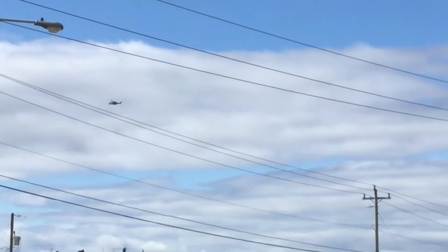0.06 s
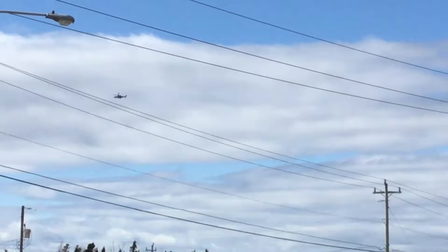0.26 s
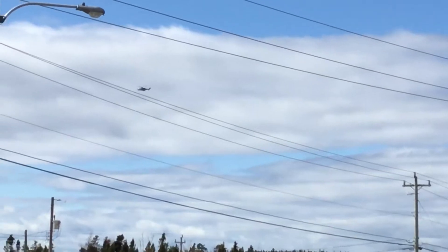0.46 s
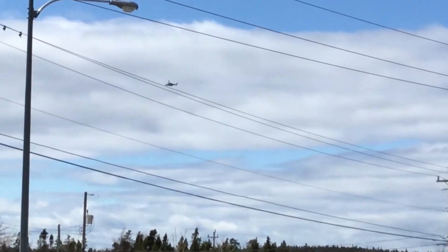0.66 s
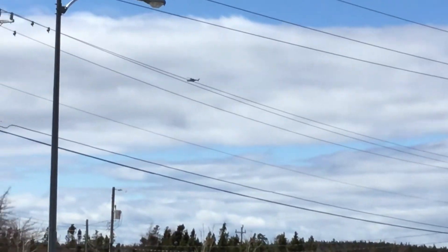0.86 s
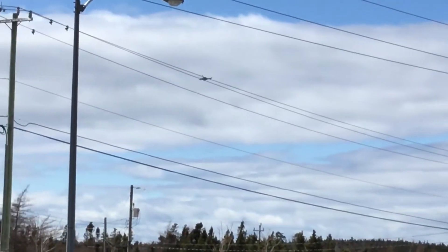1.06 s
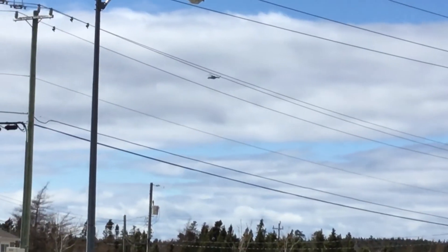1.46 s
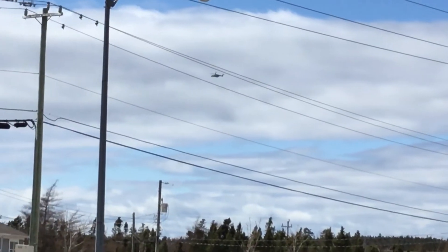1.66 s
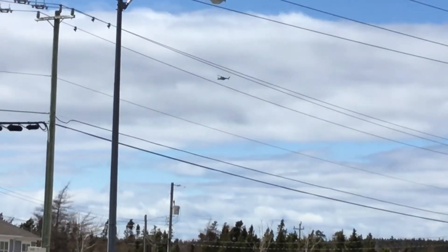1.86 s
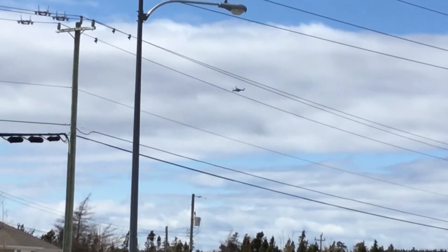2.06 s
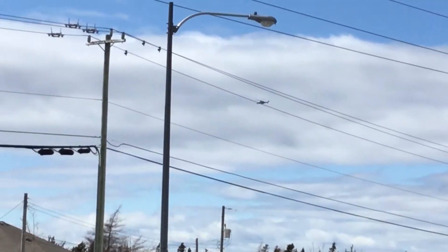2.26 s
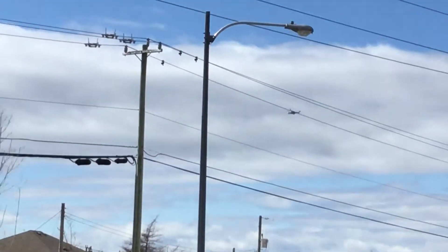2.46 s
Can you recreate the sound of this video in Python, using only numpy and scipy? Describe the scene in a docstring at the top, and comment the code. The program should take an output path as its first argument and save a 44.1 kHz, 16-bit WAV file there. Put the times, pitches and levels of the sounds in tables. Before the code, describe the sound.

A distant helicopter hums over a dull, faintly throbbing roar outdoors. Light gusts rumble and thump on the hand-held microphone throughout, with a brief rub and knock from the grip at the start and a softer one near the end.

```python
"""Distant helicopter in light wind

A far helicopter's tail rotor hums over a dull roar that throbs faintly with the main blades.
Gusts rumble on the microphone port of a hand-held camera, among short low thumps: wind buffets
and one small early knock. Twice the grip shifts: skin rubs, fingertips click and soft knocks
ring the case."""
import sys
import numpy as np
from scipy import signal
from scipy.fft import rfft, irfft
from scipy.io import wavfile

SR = 44100
rng = np.random.default_rng(int(sys.argv[2]) if len(sys.argv) > 2 else 0)


def to_wav(s):
    """Save 16-bit WAV."""
    ch = np.atleast_2d(s).T  # columns
    pcm = np.round(np.clip(ch, -1, 1) * 32767)  # PCM
    wavfile.write(sys.argv[1], SR, pcm.astype(np.int16))


N = 114660
T = np.arange(N) / SR


def amp(db):
    """Amplitude ratio of a level in decibels."""
    return 10 ** (np.asarray(db) / 20)


def unit(x):
    """Normalisation to rms 1."""
    return x / np.sqrt(np.mean(x ** 2) + 1e-20)


def curve(points):
    """Linear interpolation of (t/s, value) points."""
    return np.interp(T, *np.transpose(points))


def colour(x, spectrum):
    """Spectral shaping by (f/Hz, level/dB) points, at rms 1."""
    hz, db = np.transpose(spectrum)
    f = np.fft.rfftfreq(N, 1 / SR)
    gain = amp(np.interp(np.log(f + 1), np.log(hz), db))
    return unit(irfft(rfft(x) * gain, N))


def noise(spectrum):
    """Gaussian noise of a given spectral shape, at rms 1."""
    return colour(rng.standard_normal(N), spectrum)


def drift(hz):
    """Random fluctuation with a bandwidth of about hz, at rms 1."""
    f = np.fft.rfftfreq(N, 1 / SR)
    gain = np.exp(-(f / hz) ** 2) * (f > 0)
    return unit(irfft(rfft(rng.standard_normal(N)) * gain, N))


def lowpass(x, hz, order):
    """Causal low-pass filter."""
    return signal.sosfilt(signal.butter(order, min(hz, SR / 2 - 1), fs=SR, output="sos"), x)


def add(mix, s, sound):
    """Superposition of a sound on the mix from time s."""
    part = mix[max(round(s * SR), 0):][:len(sound)]
    part += sound[:len(part)]


# wind strength at the microphone: t/s, level/dB
GUST_LEVEL = [(0, -67), (.15, -56.5), (.32, -53.5), (.40, -54), (.48, -49), (.53, -56.5), (.59, -52.5),
              (.68, -50), (.75, -55.5), (.81, -64.5), (.92, -59.5), (1.07, -59), (1.18, -53), (1.26, -50.5),
              (1.33, -47.5), (1.43, -58), (1.57, -63.5), (1.66, -44), (1.74, -67.5), (1.82, -52.5),
              (1.98, -49.5), (2.10, -60), (2.28, -70), (2.34, -44), (2.42, -71), (2.48, -48), (2.53, -73.5),
              (2.6, -54)]
# spectrum of the turbulence: f/Hz, relative level/dB
WIND_SPECTRUM = [(15, -52), (22, -40), (30, -22), (42, -6), (60, 4.5), (100, 2.5), (170, -6.5), (260, -18),
                 (400, -30), (700, -38.5), (1500, -74.5)]

def wind(brightening=0.28, lump_db=3.5):
    """Turbulent pressure at the port: in a gust the upper band grows faster than the bass."""
    gust_db, flow = curve(GUST_LEVEL), noise(WIND_SPECTRUM)
    forward = lowpass(flow, hz=166, order=2)
    bass = lowpass(forward[::-1], hz=167, order=2)[::-1]  # the backward pass cancels the phase lag
    upper_db = brightening * (gust_db - gust_db.mean()) + lump_db * drift(hz=9.3)
    return amp(gust_db) * (bass + (flow - bass) * amp(upper_db))


# short low thumps (one small early knock, then wind buffets): t/s, peak level/dB, centre f/Hz
THUMP_PULSES = [(.062, -49, 275), (.374, -52, 320), (.395, -46, 255), (0.431, -44, 91.5),
                (.463, -42.5, 166), (.479, -41, 74), (.585, -42.5, 101), (0.683, -42.5, 124),
                (0.73, -52.5, 129), (0.988, -40, 141), (1.171, -41, 90), (1.21, -45, 55), (1.311, -38, 133),
                (1.644, -39, 177), (1.653, -36.5, 127), (1.781, -36.5, 149), (2.186, -44, 151),
                (2.486, -47.5, 89), (2.582, -48.5, 63.7)]

def thumps(width_cycles=0.45):
    """Each thump is one short pressure swing under a Gaussian envelope."""
    out = np.zeros(N)
    for s, db, hz in THUMP_PULSES:
        cycles = (T - s) * hz
        envelope = np.exp(-.5 * (cycles / width_cycles) ** 2)
        out += amp(db) * envelope * np.cos(2 * np.pi * cycles)
    return out


# slides of the grip: start t/s, rise/s, fall/s, peak level/dB
GRIP_SLIDES = [(0.21, 0.048, 0.013, -54.5), (2.313, .016, 0.037, -60)]
# spectrum of skin rubbing the case: f/Hz, relative level/dB
SKIN_SPECTRUM = [(40, -18), (100, -6), (300, 4), (620, 8.5), (820, -6.5), (1400, -14), (2700, -18.5),
                 (3500, -21.5), (4400, -28), (6500, -32), (9000, -42.5), (12000, -52)]

def rubs(grain_db=0.5):
    """Sliding friction makes grainy noise that swells and stops with the grip's motion."""
    envelope = sum(amp(db) * np.interp(T, [s, s + rise, s + rise + fall], [0, 1, 0]) ** 0.41
                   for s, rise, fall, db in GRIP_SLIDES)
    friction = rng.standard_normal(N) * amp(grain_db * drift(hz=400))
    return envelope * colour(friction, SKIN_SPECTRUM)


# fingertip landings: t/s, gain/dB, cutoff f/Hz
FINGER_TAPS = [(.2056, -45.5, 2800), (.2548, -44.5, 2660), (2.3168, -56, 6000)]

def finger_clicks(hz=594, t60_s=0.02):
    """A fingertip's impact excites one damped oscillation, a tiny hollow click."""
    out, t = np.zeros(N), T[:SR // 20]
    click = amp(-60 * t / t60_s) * np.cos(2 * np.pi * hz * t)
    for s, db, cutoff_hz in FINGER_TAPS:
        add(out, s, amp(db) * lowpass(click, cutoff_hz, order=6))
    return out


# modes of the case: f/Hz, relative level/dB, T60/s
CASE_MODES = [(143.6, -0.5, .044), (229, 0.5, 0.058), (567, -12, .032)]
# blows on the case: t/s, gain/dB, cutoff f/Hz
CASE_BLOWS = [(0.2059, -37.5, 704), (0.2566, -20.5, 510), (0.3137, -45.5, 650), (2.3180, -38.5, 395),
              (2.325, -44.5, 300)]

def knocks(sway_hz=60.7, sway_peak_s=0.029, sway_db=-19.5):
    """Soft impacts excite the damped normal modes of the case, which then sways in the hand."""
    out, t = np.zeros(N), T[:SR // 4]
    ring = sum(amp(db - 60 * t / t60) * np.cos(2 * np.pi * hz * t) for hz, db, t60 in CASE_MODES)
    ring = signal.sosfilt(signal.butter(8, 70, "high", fs=SR, output="sos"), ring)
    swell = (t / sway_peak_s * np.exp(1 - t / sway_peak_s)) ** 2
    sway = -amp(sway_db) * swell * np.sin(2 * np.pi * sway_hz * t)
    for s, db, cutoff_hz in CASE_BLOWS:
        add(out, s, amp(db) * (lowpass(ring, cutoff_hz, order=8) + sway))
    return out


# spectrum of rotor wash and turbine: f/Hz, relative level/dB
ROAR_SPECTRUM = [(15, -47), (25, -35), (50, -3.5), (90, 2), (180, -8.5), (300, -5.5), (420, -17.5),
                 (540, -20), (660, -19), (800, -25), (1000, -33), (1400, -43), (3000, -59.5)]
# strength of the roar: t/s, level/dB
ROAR_ENVELOPE = [(0, -59), (.6, -63.5), (1.2, -62), (1.8, -61), (2.3, -59.5), (2.6, -59)]

def helicopter_roar(blade_hz=24.78, depth=0.099):
    """Broadband noise, amplitude-modulated at the main rotor's blade-passing frequency."""
    chop = 1 + depth * np.cos(2 * np.pi * blade_hz * T)
    return amp(curve(ROAR_ENVELOPE)) * noise(ROAR_SPECTRUM) * chop


# tail rotor tones: harmonic number, relative level/dB
TAIL_HARMONICS = [(1, 2.5), (2, -19), (3, -27), (5, -23)]
# strength of the hum: t/s, level/dB
TAIL_ENVELOPE = [(0, -64.5), (.5, -59.5), (.85, -63.5), (1.1, -54.5), (1.5, -62), (1.9, -55), (2.1, -61.5),
                 (2.6, -64)]

def tail_rotor(blade_hz=128, wander=0.01, fading_db=1.5):
    """Periodic blade passage radiates harmonics, each fading on its own in the moving air."""
    cycles = np.cumsum(blade_hz * (1 + wander * drift(hz=10))) / SR
    hum = np.zeros(N)
    for k, db in TAIL_HARMONICS:
        gain = amp(db + fading_db * drift(hz=5.7))
        hum += gain * np.sin(2 * np.pi * (round(k) * cycles + rng.random()))
    return amp(curve(TAIL_ENVELOPE)) * unit(hum)


def scene():
    """Superposition of helicopter, wind and handling at one microphone."""
    helicopter = tail_rotor() + helicopter_roar()
    return (helicopter + wind() + thumps() + knocks() + finger_clicks() + rubs())[None]


# spectrum of the microphone's hiss: f/Hz, relative level/dB
HISS_SPECTRUM = [(100, 2.5), (1000, 0), (2000, -1), (3200, -2.5), (5000, -4), (7200, -8.5), (9000, -8.5),
                 (10200, -12.5), (13500, -14.5), (14500, -20)]

def record(dry, hiss_db=-81, cutoff_hz=14400):
    """The microphone adds self-noise, and a linear-phase low-pass limits the bandwidth."""
    hiss = amp(hiss_db) * noise(HISS_SPECTRUM)
    band_limit = signal.firwin(511, cutoff_hz, window=("kaiser", 9), fs=SR)
    return signal.oaconvolve(dry + hiss, band_limit[None], "same")


dry = scene()
out = record(dry)
to_wav(out)
```